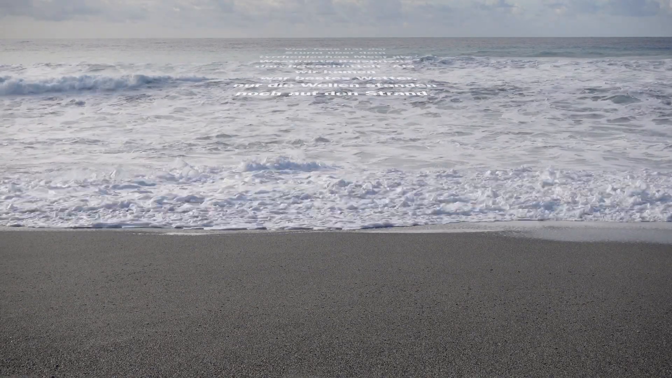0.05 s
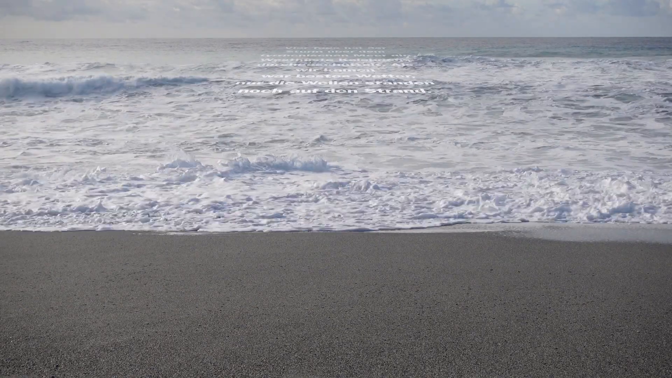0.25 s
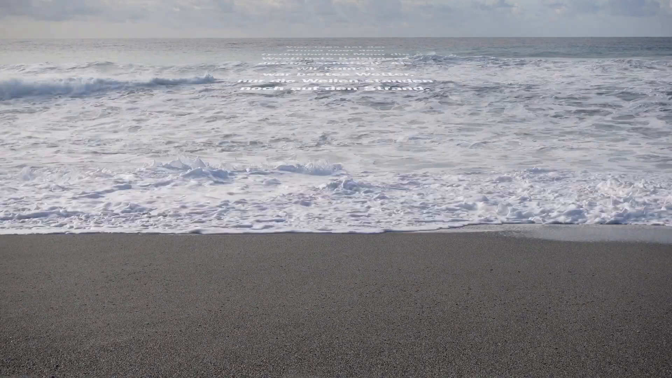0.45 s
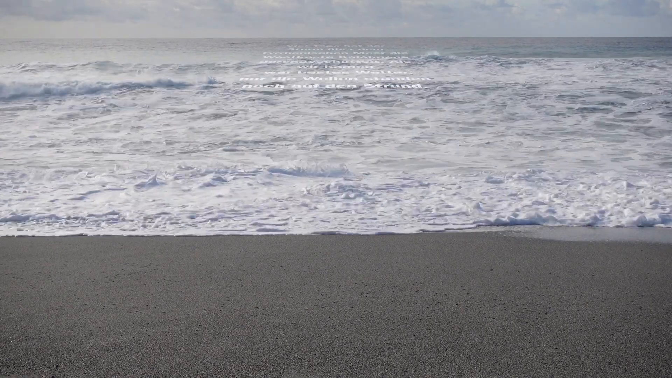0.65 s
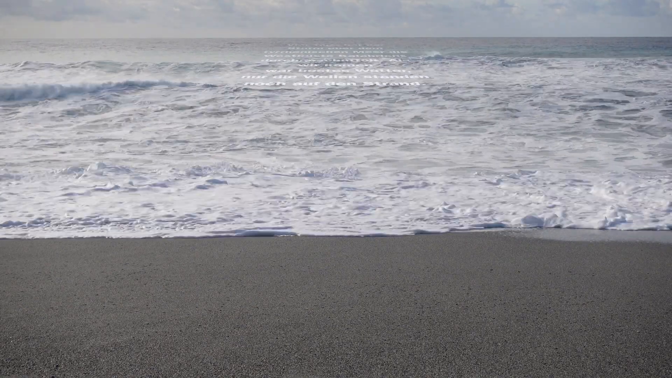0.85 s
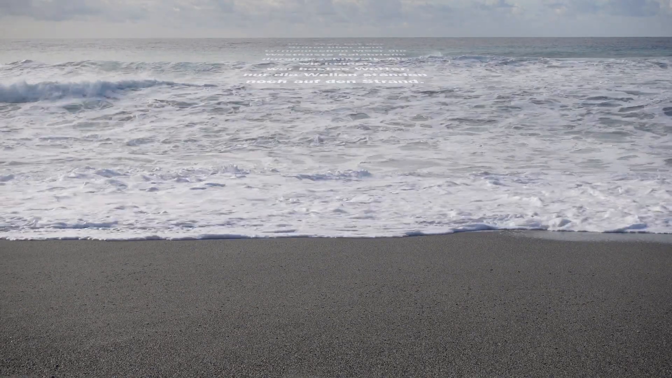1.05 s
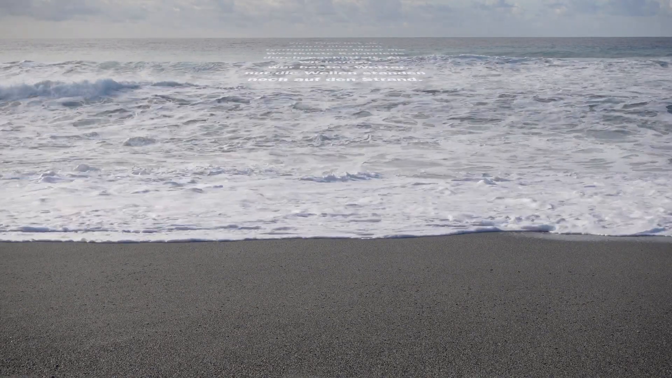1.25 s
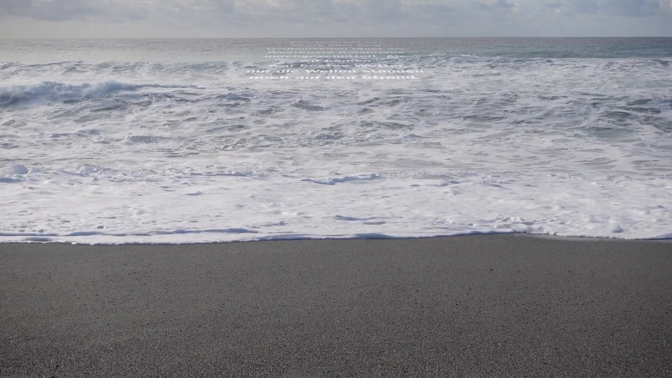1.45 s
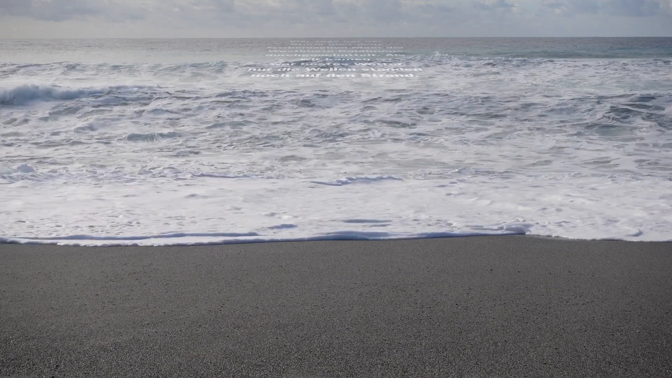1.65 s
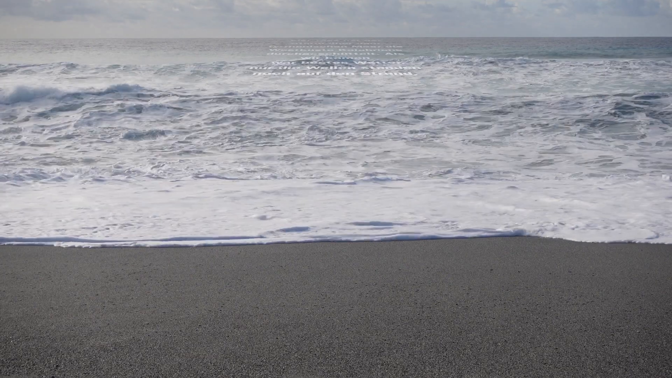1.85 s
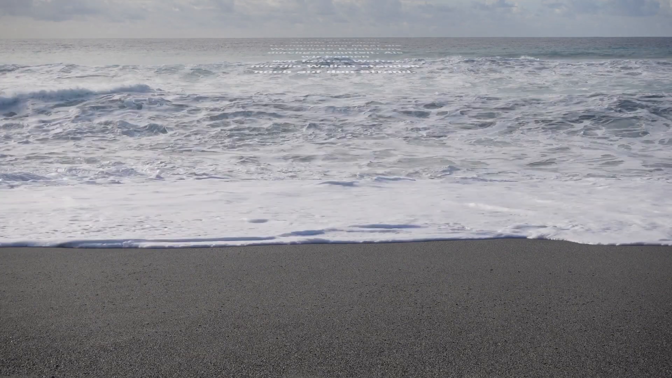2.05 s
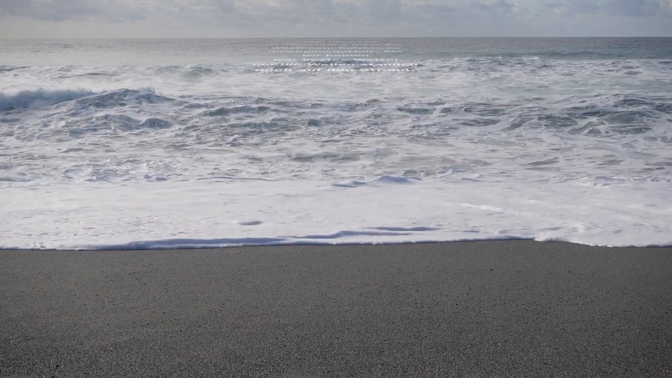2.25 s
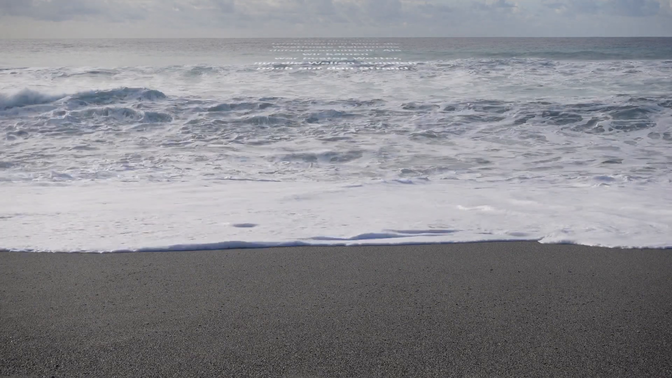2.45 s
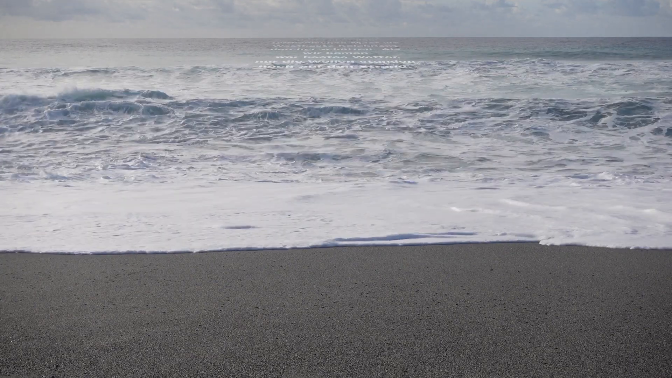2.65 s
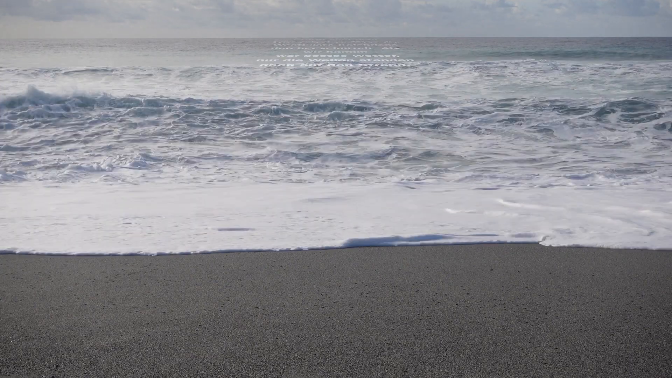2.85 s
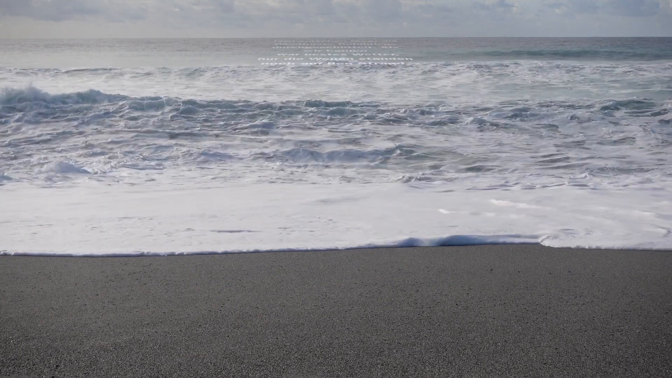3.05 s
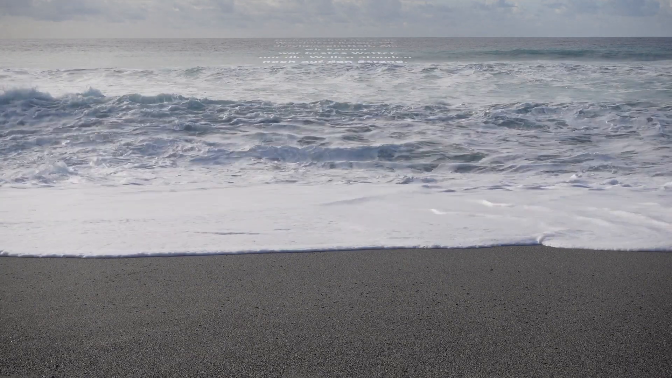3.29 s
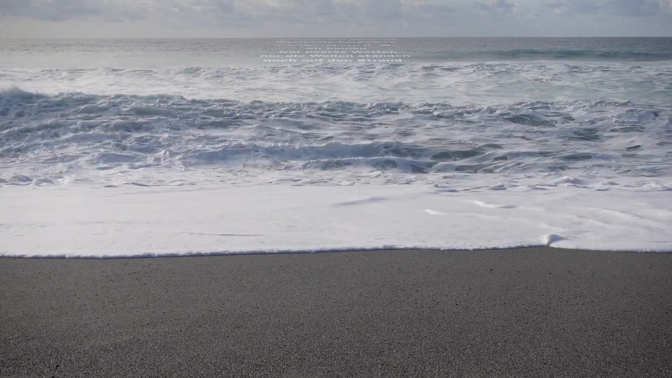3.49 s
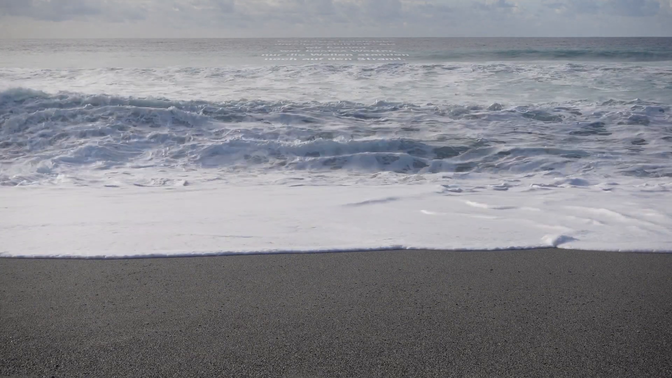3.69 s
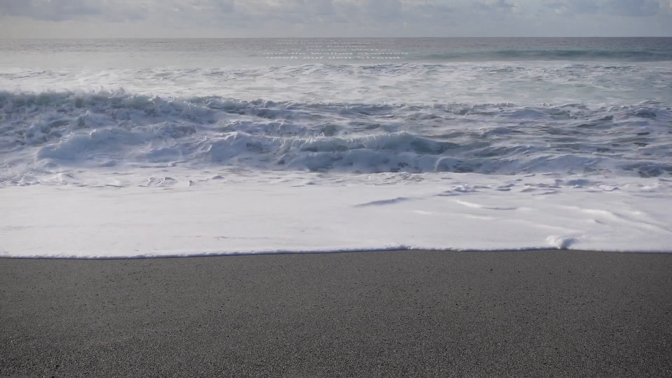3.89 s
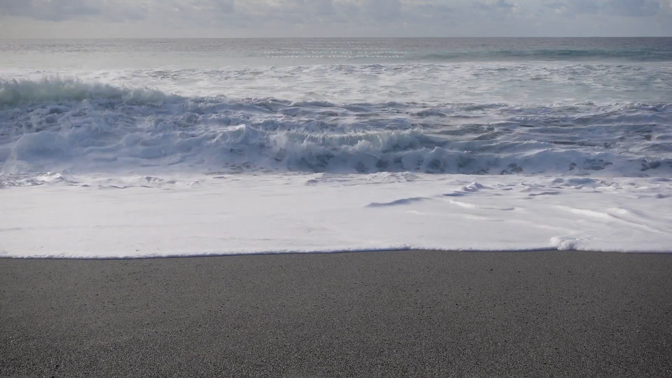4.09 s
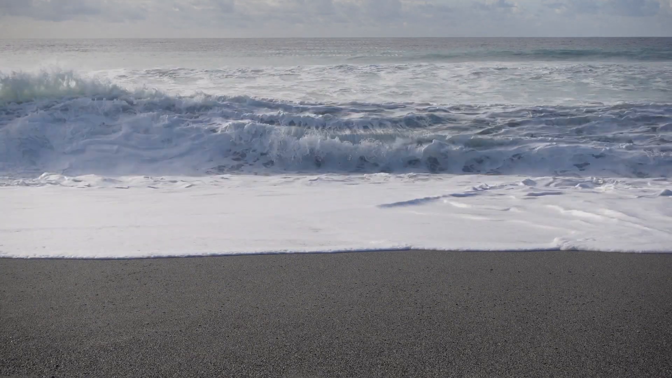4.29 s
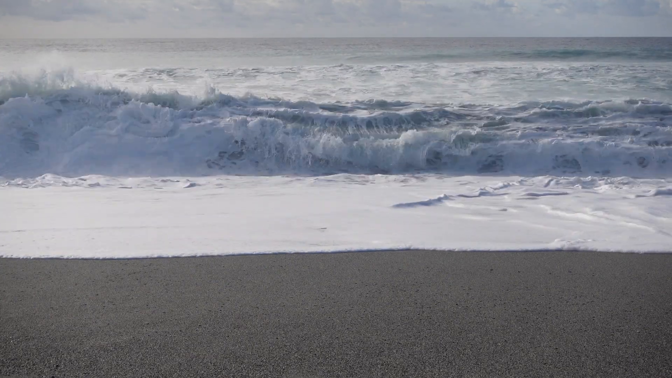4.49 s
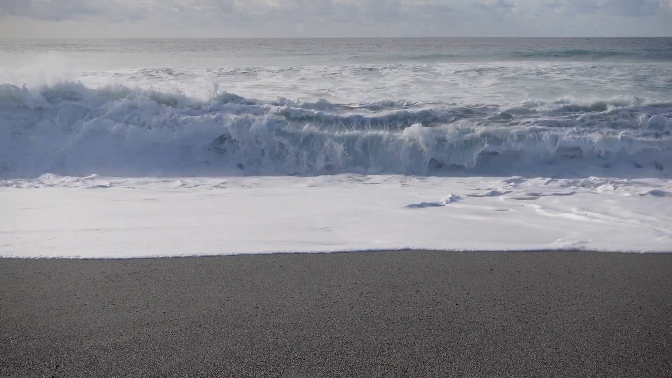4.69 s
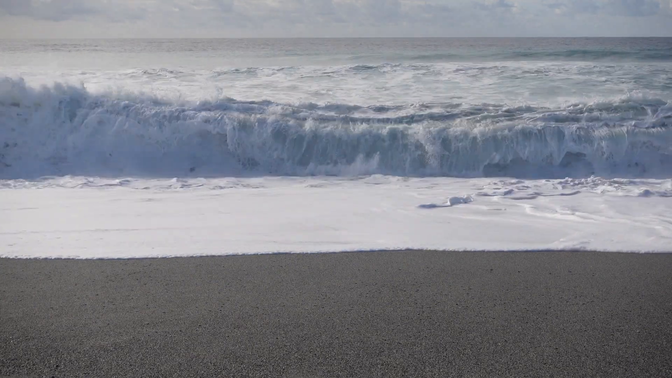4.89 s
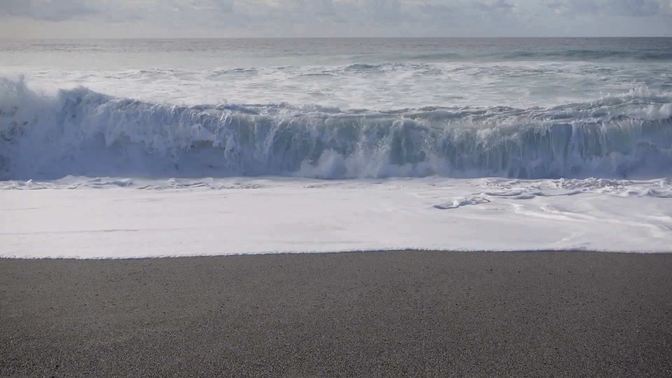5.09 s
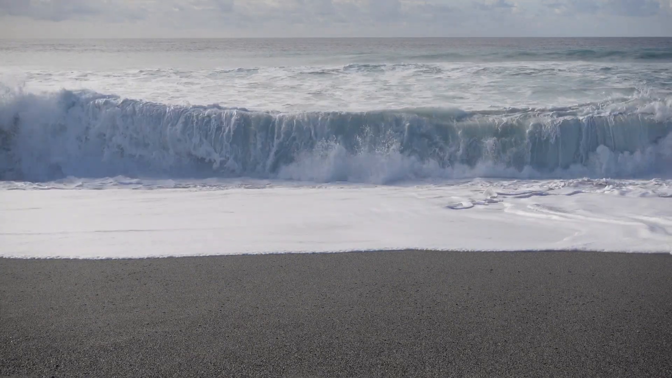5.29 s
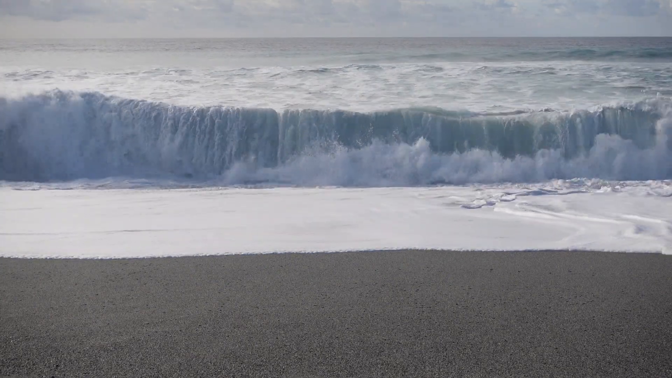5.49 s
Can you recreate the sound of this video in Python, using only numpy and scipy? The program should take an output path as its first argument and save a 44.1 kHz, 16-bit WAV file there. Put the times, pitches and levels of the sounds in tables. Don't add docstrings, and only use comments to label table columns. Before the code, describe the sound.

Continuous sea noise, first a quiet distant rumble under washing foam, then a long crescendo as a large breaker rears up. Irregular soft slaps pulse through it. The wave falls near the shore with a full low roar whose tone deepens, topped by bright crackling spray faintly coloured by a short echo off wet sand. The stereo image is narrow, drifting slightly, and the clip stops while the water is still loud.

```python
import sys
import numpy as np
from scipy import signal
from scipy.fft import rfft, irfft, next_fast_len
from scipy.io import wavfile
from scipy.ndimage import uniform_filter1d

SR = 44100
rng = np.random.default_rng(int(sys.argv[2]) if len(sys.argv) > 2 else 0)


def generate_wav(signal):
    frames = np.transpose(np.atleast_2d(signal))
    scaled = np.clip(frames, -1, 1) * 32767
    pcm = np.round(scaled).astype(np.int16)
    wavfile.write(sys.argv[1], SR, pcm)


def undo_db(level):
    steps = np.asarray(level, float) / 20
    return 10 ** steps


N = 243873

# (time [s], trapped air level [dB], foam level [dB])
SWELL = [(0, -34.5, -39), (.65, -38, -38.5), (1.3, -37.5, -37), (2.2, -36.5, -36.5), (2.9, -34.5, -34.6),
         (3.7, -32, -33.5), (4, -31, -30.5), (4.23, -29, -30.5), (4.31, -27, -27.3), (4.62, -25, -27),
         (4.95, -21.3, -26.3), (5.42, -19, -25.5), (5.53, -21.5, -24.3)]
# (time [s], boom level [dB], spray level [dB], fizz level [dB])
CREST_SLAPS = [(.42, 2, 0.2, 0), (.78, 2.5, -0.3, 1), (1.12, -0.5, 1, -1.2), (1.5, 2.5, -0.4, 3),
               (1.8, .6, .6, 1), (2.34, 2, 0.5, 1), (2.72, 1, -1, .3), (3.16, 0, 1.2, 0),
               (3.32, 0.5, 2, -4), (3.82, 2, 0.2, 0.5), (4.03, 0, .7, 1), (4.5, 2.5, 0.1, .2),
               (4.72, 0.2, 1.9, -1.1), (4.86, 1.5, -0.1, -2.5), (5.1, -1, .5, 1.5), (5.2, 0.2, .6, .6),
               (5.33, 2.5, -0.2, 2)]
SLAP_RISE_S, SLAP_FALL_S = 0.068, 0.093
PLUNGE_S, PLUNGE_LENGTH_S = 4.76, 0.38


def sea(t):
    slap_s, *sizes_db = np.transpose(CREST_SLAPS)
    age = t[:, None] - slap_s
    rise = np.clip(age / SLAP_RISE_S, 0, 1)
    fall = np.exp(-np.maximum(age - SLAP_RISE_S, 0) / SLAP_FALL_S)
    boom_db, spray_db, fizz_db = np.array(sizes_db) @ (rise * fall).T
    air_db, foam_db = follow(SWELL, t)
    fallen = np.clip((t - PLUNGE_S) / PLUNGE_LENGTH_S, 0, 1)
    return air_db + boom_db, foam_db + spray_db, fizz_db, fallen


# (frequency [Hz], level per Hz [dB])
NEAR_BOOM = [(15, -85), (30, -44), (60, -20), (101, -3.5), (140, -4.5), (186, -0.5), (245, -2.5), (300, -4),
             (400, -4), (550, -7), (620, -11.5), (700, -16), (950, -24), (1240, -46)]
# (frequency [Hz], level per Hz [dB])
FAR_ROAR = [(15, -75), (30, -53), (64, -20), (97, -4), (140, -5), (190, 1), (240, -8), (290, -9),
            (360, -23.5), (430, -34), (560, -51), (950, -120)]
# (frequency [Hz], left over right [dB])
RUMBLE_BALANCE = [(60, -3), (110, -0.5), (200, -1.0), (380, -2), (700, 0.5), (1290, -4), (2380, -0.5),
                  (4400, 0.5), (8120, 0.0), (15000, 0.0)]
BOOM_HALF_DB, BOOM_SPAN_DB = -28.5, 2.5
POCKET_HZ, POCKET_SAG_HZ = 277, 97
POCKET_DB, POCKET_OCTAVES = 4, 0.41


def rumble():
    hz, t = grid(size=2048)
    air_db, _, _, fallen = sea(t)
    near = 1 / (1 + np.exp((BOOM_HALF_DB - air_db) / BOOM_SPAN_DB))
    pocket_hz = POCKET_HZ - POCKET_SAG_HZ * fallen
    octaves_away = np.log2((hz[:, None] + 1) / pocket_hz)
    pocket_db = POCKET_DB * np.exp(-(octaves_away / POCKET_OCTAVES) ** 2)
    boom = unit_power(NEAR_BOOM, hz) * (hz < 1500)[:, None] * undo_db(2 * pocket_db)
    power = (1 - near) * unit_power(FAR_ROAR, hz) + near * boom
    lean_db = read(RUMBLE_BALANCE, hz)[:, None]
    noise = bubbling(power, lean_db, size=2048, patch_hz=60, patch_s=0.15, patchy_db=0.5, flicker_db=0.02)
    level_db = sea(np.arange(N) / SR)[0]
    return undo_db(level_db + 0.06) * noise


# (frequency [Hz], level per Hz [dB])
NEAR_SPRAY = [(200, -80), (470, -38), (800, -3), (1000, -4), (1900, -0.5), (2630, -1), (3460, -1),
              (4500, -4.5), (5900, -6), (8000, -12.5), (10500, -18.5), (13400, -30), (15600, -36)]
# (frequency [Hz], level per Hz [dB])
FAR_HISS = [(100, -80), (240, -29), (400, -3.5), (600, -3.5), (900, -1.5), (1300, -2.5), (2000, -3.5),
            (3100, -4.5), (5000, -8.5), (7800, -16), (10500, -22.5), (13000, -34), (15600, -37)]
# (time [s], coarse foam [dB], fine foam [dB])
FOAM_DRIFT = [(0.0, -2.5, 0.0), (1.34, -1.5, 0.5), (1.54, -2, 2.5), (2.0, -2.5, 0.5), (3.13, 1, 2),
              (3.37, 0, 2.5), (4.97, -1.5, 1), (5.53, -1, 0)]
SPRAY_FROM_DB, SPRAY_SPAN_DB = -39.5, 13
DULL_SPRAY = 0.9
ECHO_PATH_M, ECHO_DROP_M = 0.209, 0.03
ECHO_SHARE, ECHO_FADE_HZ = 0.16, 4970


def foam():
    hz, t = grid(size=512)
    _, foam_db, fizz_db, fallen = sea(t)
    near = np.clip((foam_db - DULL_SPRAY * fizz_db - SPRAY_FROM_DB) / SPRAY_SPAN_DB, 0, 1)
    delay_s = (ECHO_PATH_M - ECHO_DROP_M * fallen) / 343
    echo = ECHO_SHARE * np.exp(-hz / ECHO_FADE_HZ)[:, None]
    comb = abs(1 + echo * np.exp(-2j * np.pi * hz[:, None] * delay_s)) ** 2
    power = (1 - near) * unit_power(FAR_HISS, hz) + near * unit_power(NEAR_SPRAY, hz) * comb
    finest = 1 / (1 + (6000 / (hz + 1)) ** 2)[:, None]
    power = power * undo_db(2 * finest * fizz_db)
    coarse_db, fine_db = follow(FOAM_DRIFT, t)
    coarse_lean = np.outer(np.exp(-(hz / 2800) ** 4), coarse_db)
    fine_lean = np.outer(np.exp(-((hz - 4300) / 900) ** 2), fine_db)
    noise = bubbling(power, coarse_lean + fine_lean, size=512, patch_hz=880, patch_s=0.058,
                     patchy_db=0.4, flicker_db=0.1)
    level_db = sea(np.arange(N) / SR)[1]
    return undo_db(level_db + 0.3) * noise


# (frequency [Hz], side noise under the middle [dB])
SIDE_NOISE = [(60, -30), (200, -27.5), (380, -23), (700, -18), (1300, -22.5), (2400, -23.5), (3200, -22),
              (4400, -22.5), (5200, -23), (6200, -27.5), (7000, -90)]


def bubbling(power, lean_db, size, patch_hz, patch_s, patchy_db, flicker_db):
    hz, t = grid(size)
    a, b, c, d, patches = rng.standard_normal((len(t), len(hz), 5)).T
    flicker = rng.standard_normal(len(t))
    patches = uniform_filter1d(patches, max(round(patch_hz / hz[1]), 1), axis=0)
    patches = evened(uniform_filter1d(patches, max(round(patch_s / t[1]), 1), axis=1))
    mid = a + 1j * b
    side = (c + 1j * d) * undo_db(read(SIDE_NOISE, hz))[:, None]
    left = (mid + side) * undo_db(lean_db / 2)
    right = (mid - side) / undo_db(lean_db / 2)
    unevenness = undo_db(patchy_db * patches + flicker_db * flicker)
    frames = np.array([left, right]) * np.sqrt(power / power.sum(axis=0)) * unevenness
    return evened(signal.istft(frames, nperseg=size, noverlap=3 * size // 4)[1][:, :N])


def read(points, hz):
    f, value = np.transpose(points)
    return np.interp(np.log(hz + 1), np.log(f + 1), value)


def unit_power(points, hz):
    power = undo_db(2 * read(points, hz))
    return (power / power.sum())[:, None]


def evened(x):
    return x / np.sqrt(np.mean(x ** 2) + 1e-20)


def grid(size):
    return np.fft.rfftfreq(size, 1 / SR), np.arange(4 * N // size + 5) * size / 4 / SR


def follow(table, t):
    s, *columns = np.transpose(table)
    return [np.interp(t, s, c) for c in columns]


DIP_HZ, DIP_WIDTH_HZ, DIP_DB = 427, 55, -2.26
LOW_CUT_HZ = 23


def scene():
    size = next_fast_len(N)
    hz = np.fft.rfftfreq(size, 1 / SR)
    ground = undo_db(DIP_DB * np.exp(-((hz - DIP_HZ) / DIP_WIDTH_HZ) ** 2))
    bass_fade = hz ** 2 / (hz ** 2 + LOW_CUT_HZ ** 2)
    return irfft(rfft(rumble() + foam(), size) * ground * bass_fade, size)[:, :N]


def low_pass(x):
    return signal.sosfilt(signal.butter(12, 15660, fs=SR, output="sos"), x)


def record(dry):
    return low_pass(dry)


dry = scene()
out = record(dry)
generate_wav(out)
```